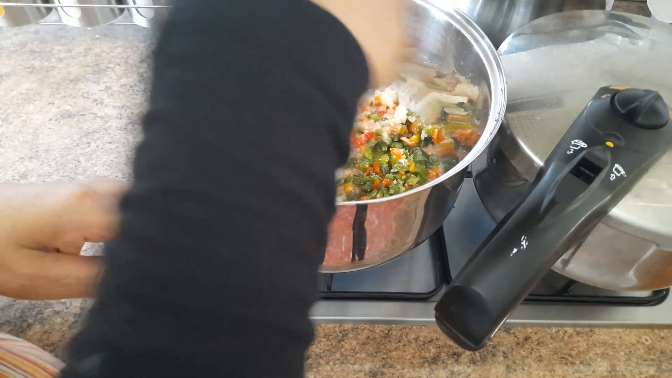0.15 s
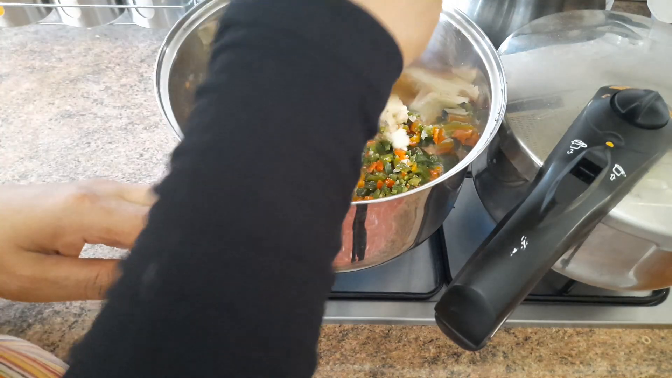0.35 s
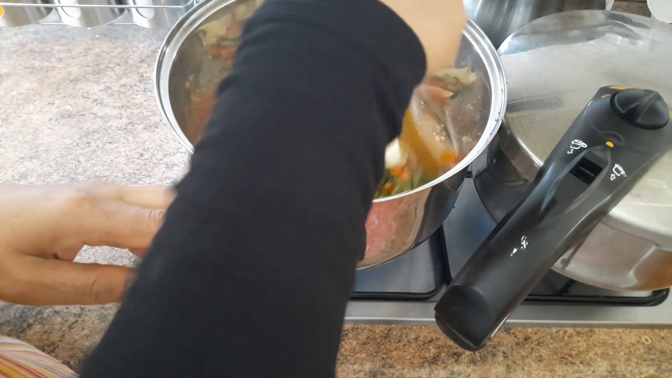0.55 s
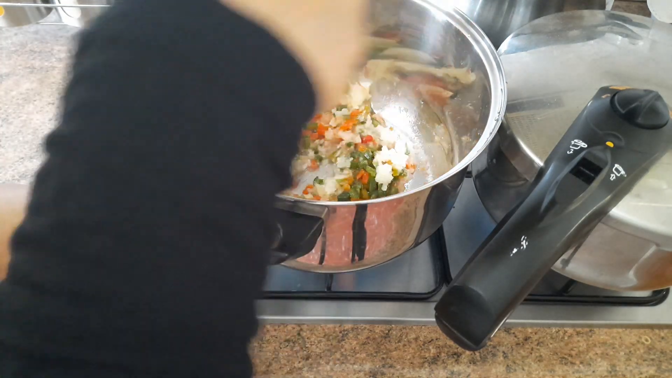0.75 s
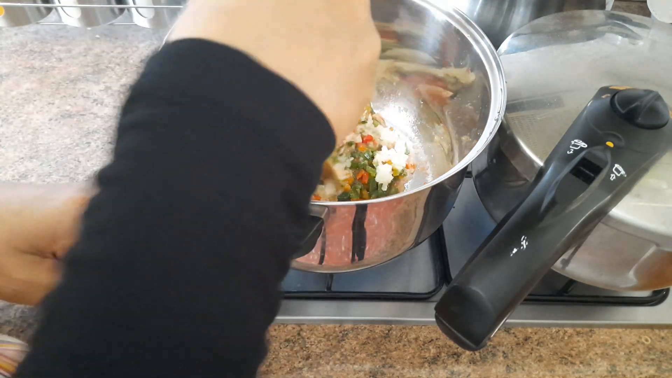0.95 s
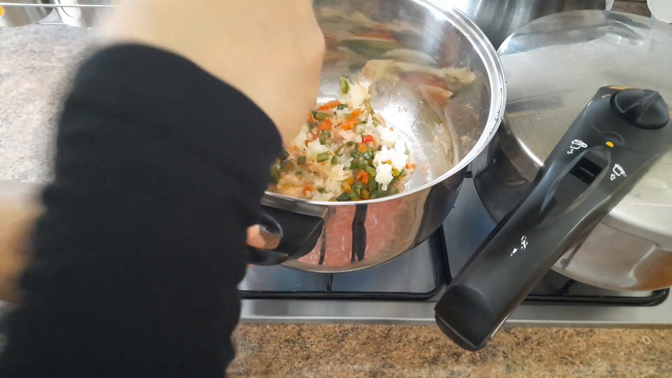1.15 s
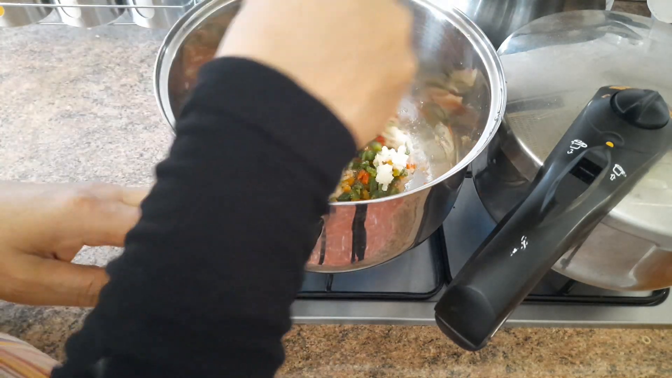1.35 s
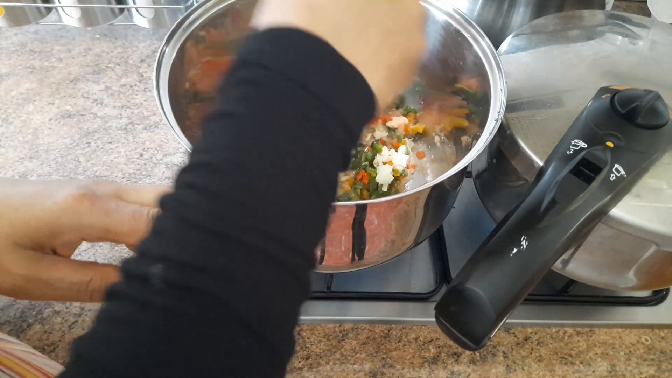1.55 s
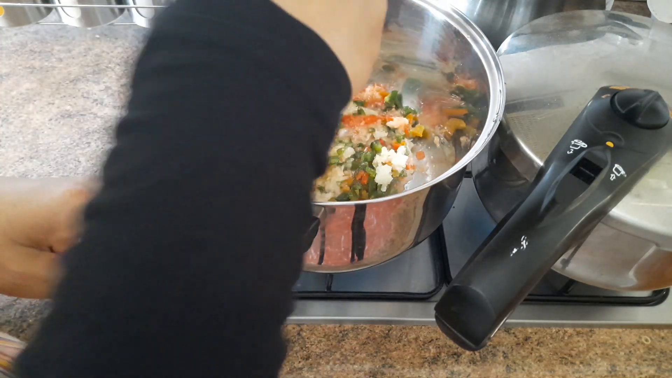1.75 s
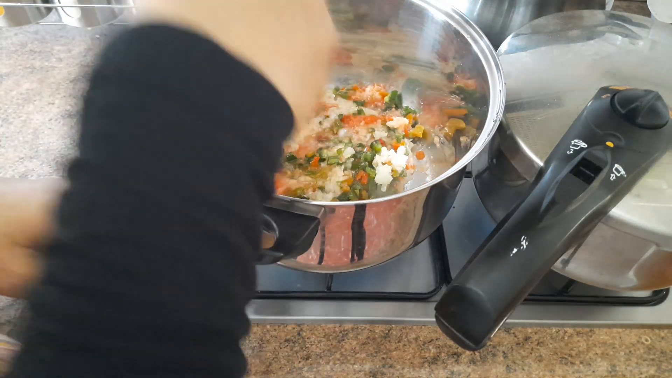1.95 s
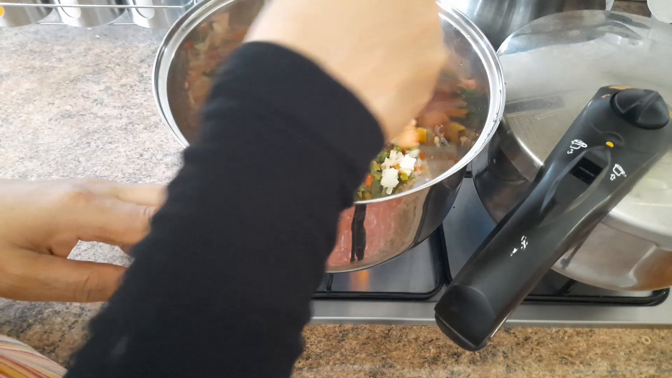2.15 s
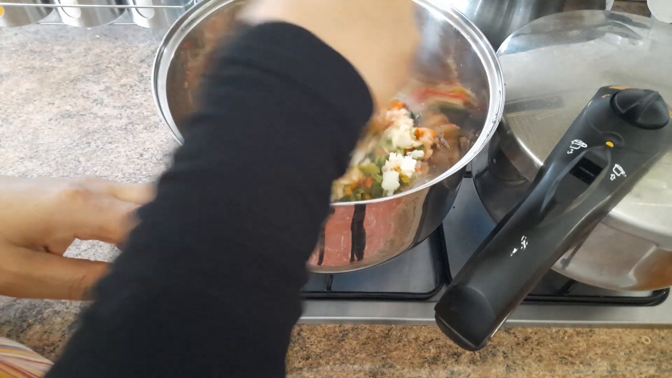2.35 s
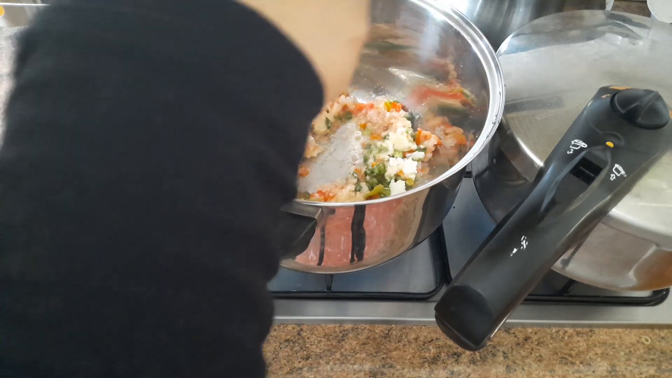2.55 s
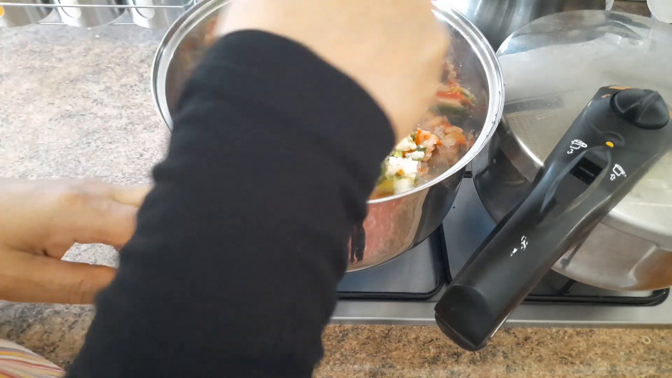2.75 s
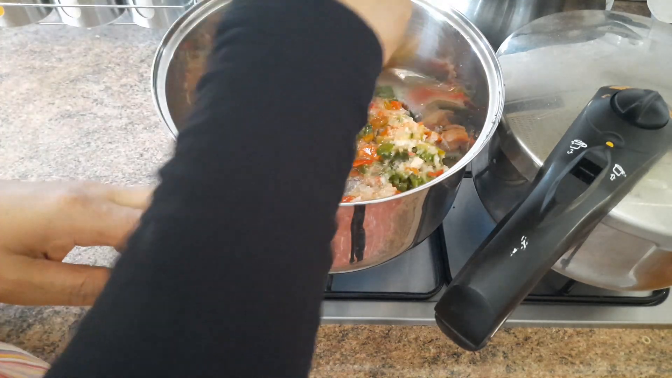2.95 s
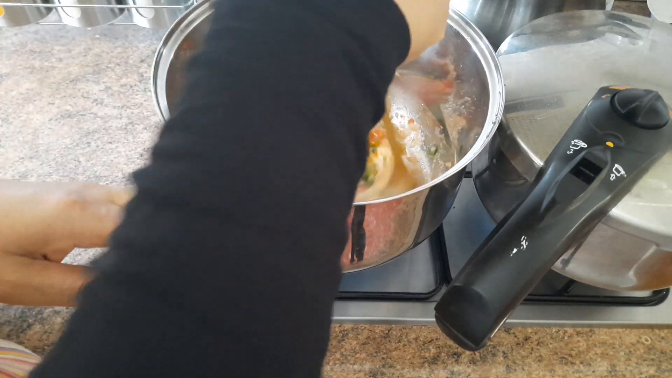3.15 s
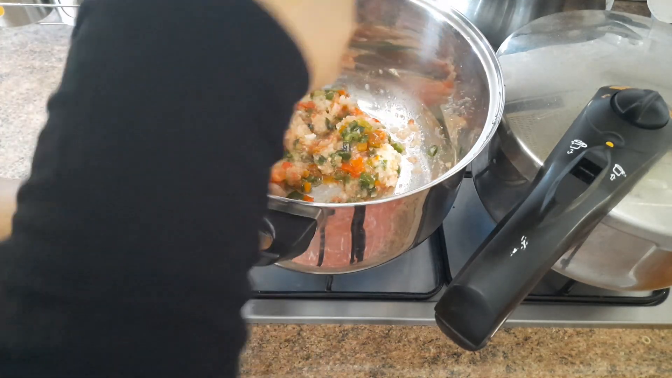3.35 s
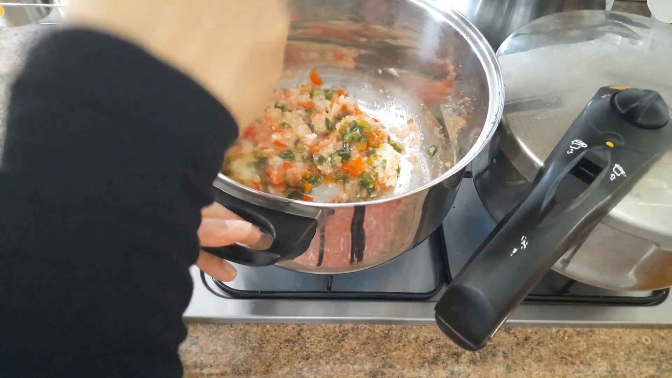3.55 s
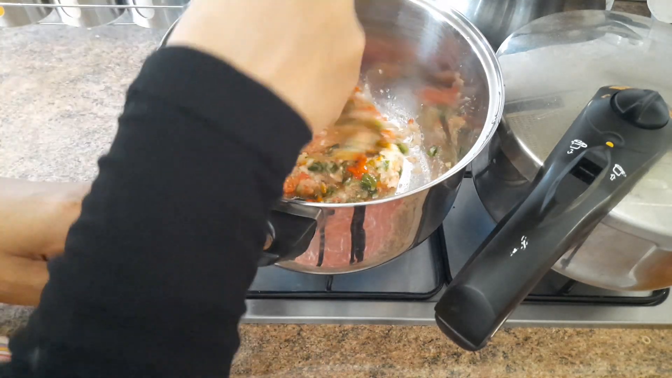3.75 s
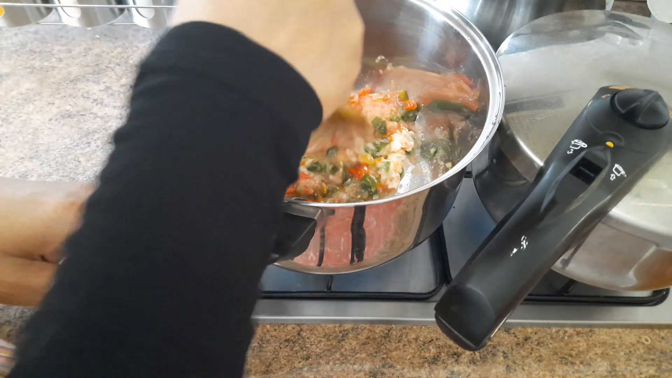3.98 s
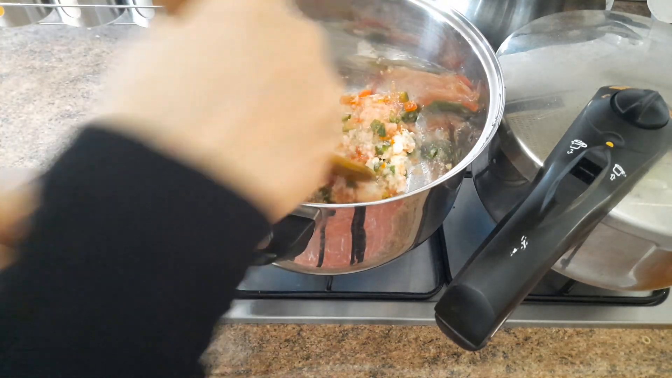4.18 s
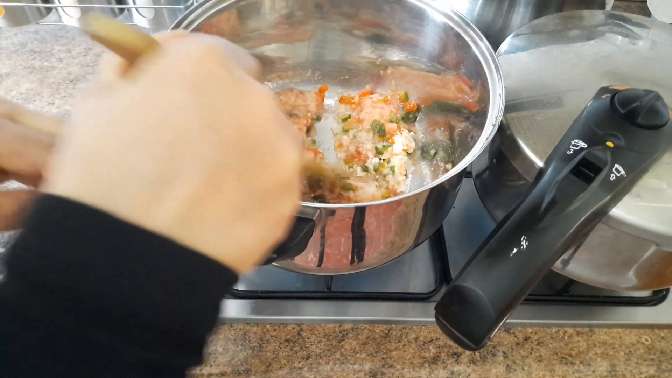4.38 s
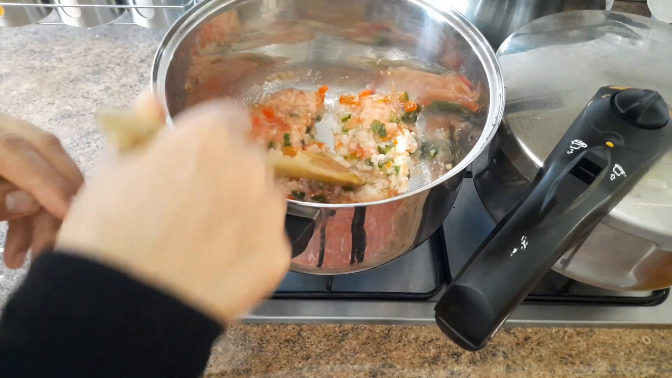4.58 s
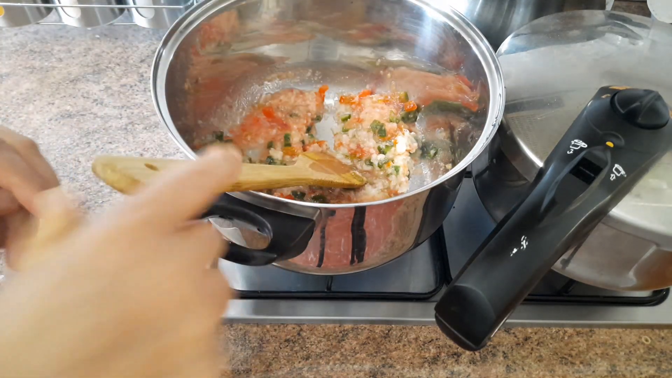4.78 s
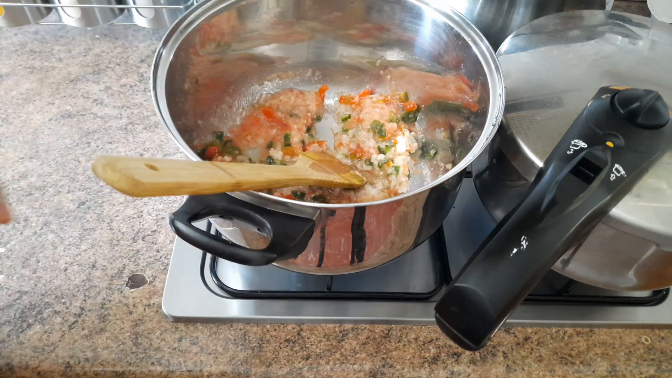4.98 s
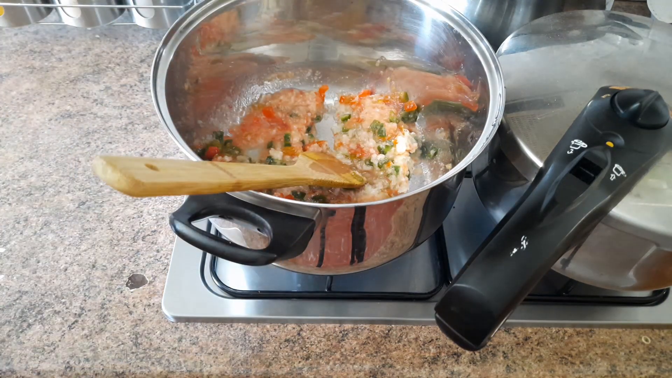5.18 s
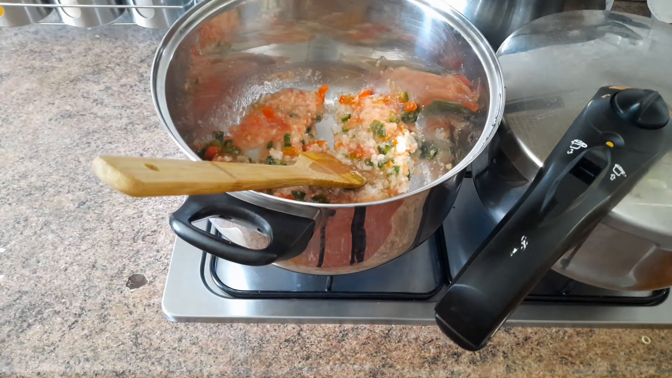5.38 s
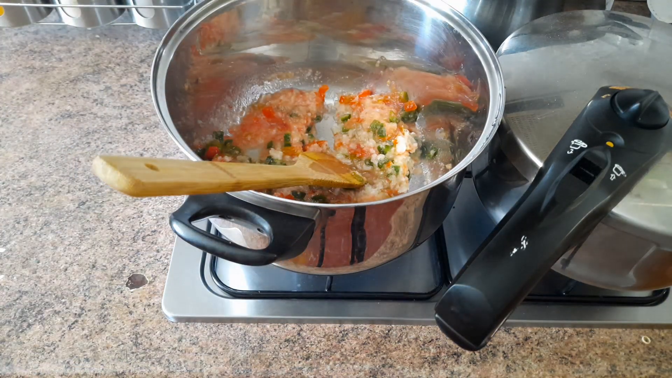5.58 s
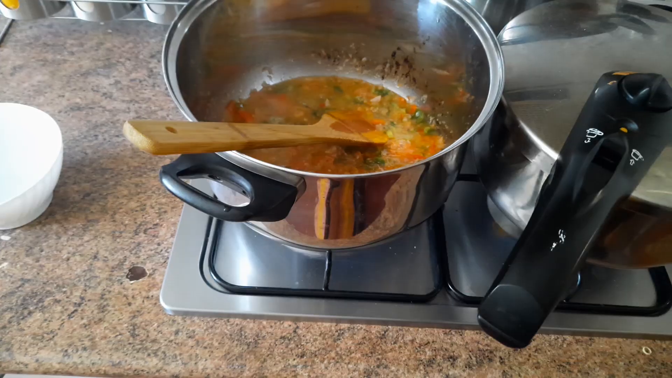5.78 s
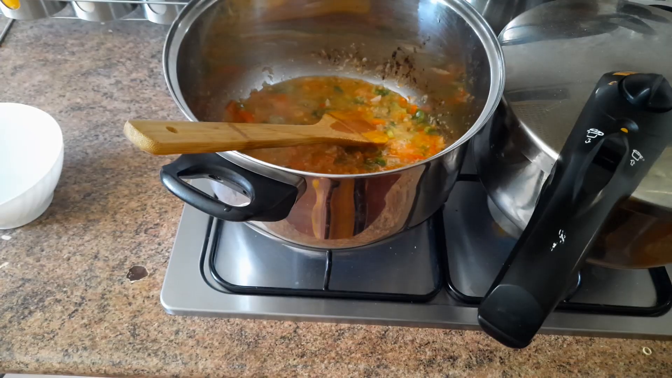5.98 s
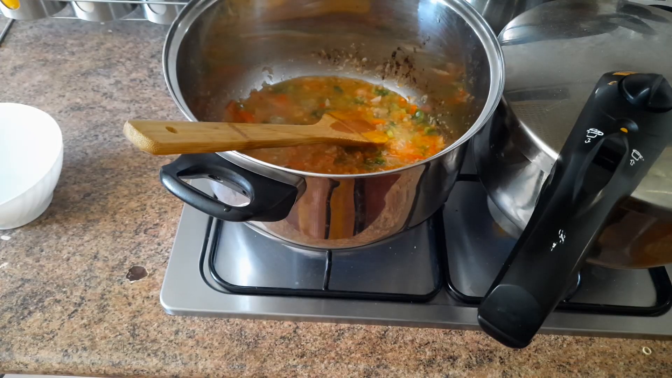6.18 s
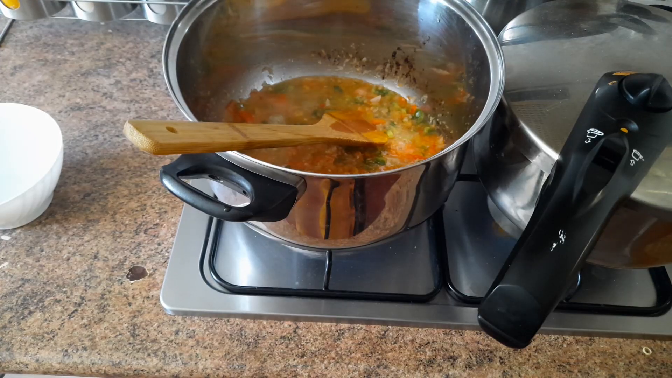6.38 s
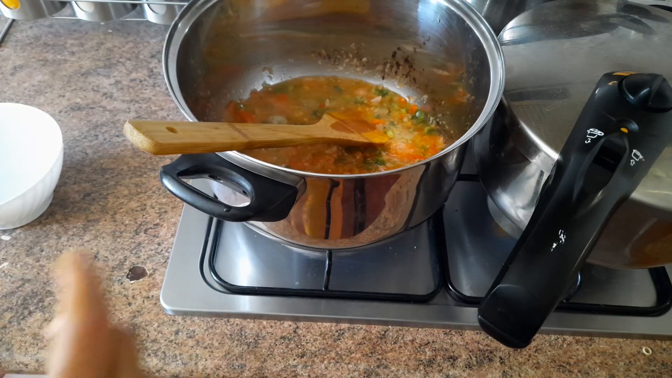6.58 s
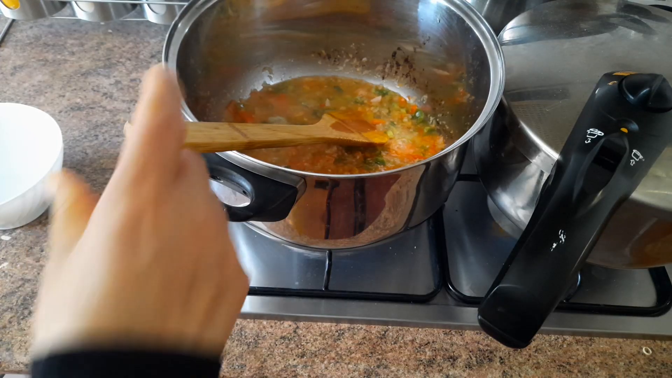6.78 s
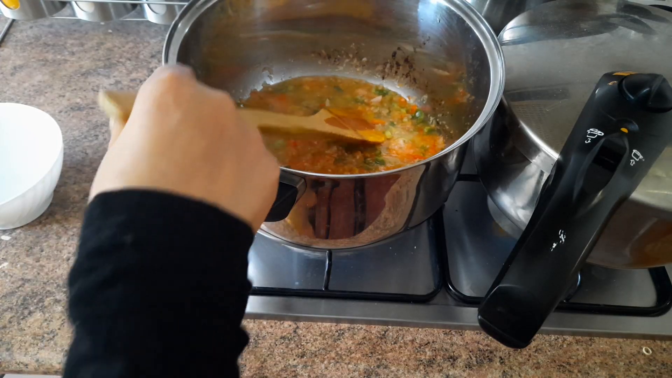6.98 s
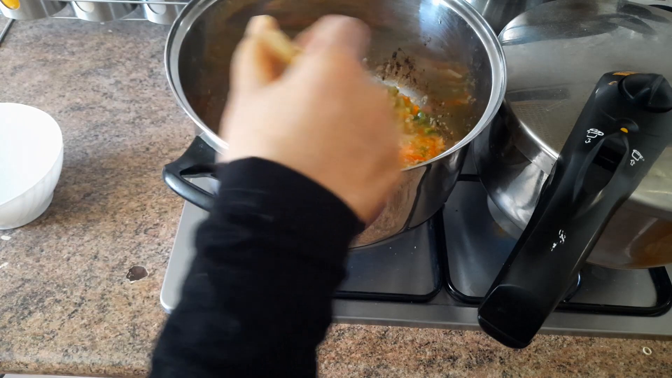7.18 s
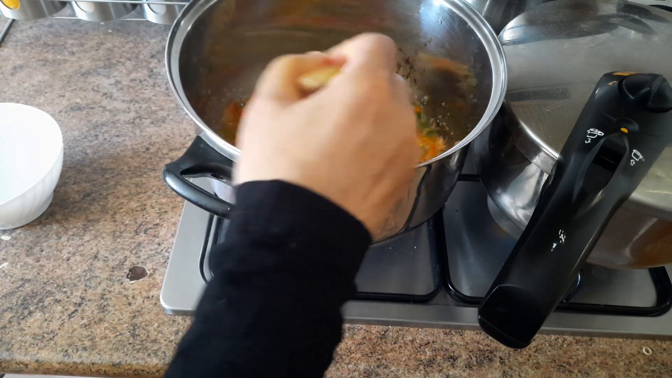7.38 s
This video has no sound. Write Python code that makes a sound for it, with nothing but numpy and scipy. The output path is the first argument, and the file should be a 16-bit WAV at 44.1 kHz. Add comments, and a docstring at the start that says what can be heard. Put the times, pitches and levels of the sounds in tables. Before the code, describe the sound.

A small, hard kitchen, heard closely in stereo with the pot slightly left. A quiet gas burner rushes steadily with a thin jet hiss. From 0 s a wooden spoon stirs food in a steel pot: soft thuds at 0.15, a resonant knock at 0.4, then a sleeve swish and drag around 0.55. Small muffled bumps and low scrapes follow until a bright, hard clank at 1.87. More drag at 2.3, knocks at 2.6, 2.95 and 3.5, a strong thud at 3.6, another clack at 3.83. A last scrape near 4.05, then the spoon is laid down with woody knocks at 4.44 and 4.66 and slight cloth rustle until 5. Near quiet. At about 5.75 soft sizzling with bubbling and fine crackle starts quickly, surging near 6.2 with low pops, slowly easing. Sleeve rustle at 6.9; faint tap and thud at 7.23 as the spoon is lifted.

```python
"""Stirring a pot on a gas hob

A wooden spoon stirs chopped vegetables in a steel pot in a small, hard kitchen. Knocks and thuds are
noise contacts plus ringing pot modes; drags and swishes (sleeve, faint wet flicks of food, one surge of
the sizzle) are filtered click patter under strokes. The spoon is laid down; later the oil is sizzling
(patter and tiny bursts), and the spoon is picked up again. Single spits pop, and the burner rushes as
steady filtered noise."""
import sys
import numpy as np
from scipy import signal
from scipy.fft import rfft, irfft, next_fast_len
from scipy.io import wavfile
from scipy.ndimage import uniform_filter1d

SR = 44100
rng = np.random.default_rng(int(sys.argv[2]) if len(sys.argv) > 2 else 0)


def transcribe(u):
    """Save the signal u as a 16-bit wav file named by the first command-line argument.

    u: samples, shape (n,) or (channels, n), limited to [-1, 1]; the rate is SR.
    q: integer samples, one column per channel.
    """
    v = np.clip(np.atleast_2d(u).T, -1, 1)
    q = np.round(v * 32767).astype(np.int16)
    wavfile.write(sys.argv[1], SR, q)


N = 327663  # samples

T_S = np.arange(2 ** 15) / SR
GRID_HZ = np.fft.rfftfreq(2 ** 15, 1 / SR)

# edges of the bands that set a blow's spectrum: f/Hz
BAND_EDGES_HZ = [35, 115, 230, 700, 1500, 4000, 8000, 16000]
CENTRES_HZ = np.sqrt(np.multiply(BAND_EDGES_HZ[1:], BAND_EDGES_HZ[:-1]))
# spoon on steel: t/s, level/dB, hardness/(dB/octave), push on the grate/dB,
#   favoured low mode f/Hz, favoured high mode f/Hz, their boost/dB, time until the spoon mutes the ring/s
KNOCKS = [(0.05, -45, -0.8, 0, 495, 2400, 7, 0.1), (0.401, -34, -2.5, -7, 969, 2955, 16.5, 0.21),
          (1.868, -28, 3, 1, 867, 2121, 9, 0.28), (2.598, -31.5, 0.97, 3, 969, 1825, 11.5, 0.25),
          (2.945, -37, -1.4, -5, 1001, 1825, 8, 0.14), (3.48, -32.5, 1.3, -8, 1001, 2062, 10, 0.13),
          (3.831, -33.5, 0.8, -2.5, 2237, 3155, 12.5, 0.11),
          (4.099, -55.5, -0.5, 9, 495, 2400, -4.5, 0.037), (4.44, -30, -4.5, -4.5, 144, 495, 8.5, 0.07),
          (4.66, -35.5, 1.4, 4.5, 322, 2062, 0, 0.055), (7.225, -50, 0, 4, 595.5, 2400, 6, 0.059)]
# knock of medium hardness: f/Hz, level of the band around it/dB
KNOCK_BANDS = [(63, -23), (163, -17), (400, -4), (1025, -5), (2450, .5), (5660, -3.5), (11300, -13)]
# broad lift around the low favoured mode, slight dip around the high one: level/dB, width/octaves
SPOT_GAINS = [(5.5, 0.37), (-1.5, .22)]
# blows cushioned by food or passed to the grate: t/s, level/dB, hardness/(dB/octave),
#   push on the grate/dB, direct sound over room/dB
THUDS = [(0.135, -33, -3, 6, -3), (0.162, -37.5, 3.5, 4, -3.5), (1.147, -45.5, -3.5, 5, 3),
         (1.173, -47, -2, 2, -4), (1.501, -49.5, -6.5, -5, 7), (1.604, -56, 4, 2.5, -2),
         (2.261, -42.5, -5, -4, 4), (2.983, -43, 3, 0, 4.5), (3.598, -23, 1.23, -10, 3),
         (4.723, -48.5, -5, 3, 8), (7.246, -41, 0.5, 0.5, -1)]
# thud of medium hardness: f/Hz, level of the band around it/dB
THUD_BANDS = [(63, -19), (163, -15), (400, -1.5), (1025, -9.5), (2450, -19.5), (5660, -33.5), (11300, -41)]
# modes of the pot: f/Hz, level/dB, t60/s
POT_MODES = [(144, -3.5, 0.72), (322, -1, 0.42), (386.6, -0.5, 0.22), (495, -5, 0.49), (590, 6, 0.33),
             (802, -9, .35), (867, -3, 0.47), (969, -4.5, 0.96), (1001, 1, 0.32), (1040, 9.5, 0.25),
             (1234, -11, 0.35), (1607, -1, 0.43), (1650, -0.5, 0.073), (1825, 0.5, 0.17), (1916, 0, 0.27),
             (2062, -5, 0.56), (2121, -2.5, 0.38), (2237, 3.5, .25), (2400, 13, 0.14), (2550, -5, .25),
             (2955, -7.5, 0.65), (3083, 6.5, 0.32), (3155, -2.5, 0.59), (3700, 8.5, 0.15), (3989, -3, .22),
             (4490, -8, .2), (4970, 4.5, .2), (5870, -10.5, .22), (5720, -3.5, .22), (6490, 8.5, 0.24)]
# colour of a blow on pot and hob, before its bands are set: f/Hz, level/dB
BLOW_COLOUR = [(25, -27.5), (55, -10.5), (110, -4.5), (152, -0.5), (200, -1), (230, -13.5), (285, 5.5),
               (520, 4), (660, -1), (1000, -2), (1350, -1), (2100, 7.5), (2800, 1.5), (7500, -11.5),
               (9500, -20), (12500, -19.5), (16000, -28.5)]
# spoon dragging food over the bottom: t at full pressure/s, rise/s, hold/s, level/dB
DRAGS = [(0.04, 0.15, .01, -58), (0.545, 0.035, 0.04, -49.5), (0.76, .09, 0.021, -55),
         (1.14, 0.11, .01, -60), (1.37, 0.055, 0.025, -63), (1.56, 0.06, 0.072, -51),
         (2.28, 0.078, .11, -49), (3.195, 0.059, 0.015, -47.5), (3.35, 0.043, .02, -62),
         (4.04, 0.087, 0.053, -51)]
# colour of the drags: f/Hz, level/dB
DRAG_COLOUR = [(71, -60), (120, -15), (220, -26), (296, 2), (409, 1.5), (612, -3), (759, -20),
               (1040, -11.5), (1360, -35.5), (2260, -27), (3000, -32), (3900, -61.5), (6600, -120)]
# swishes of sleeve, faint wet flicks of food at 0.135, 1.7 and 5.21 s, and at 6.185 s a surge
#   of the sizzle: t at full strength/s, rise/s, hold/s, level/dB
SWISHES = [(0.135, 0.045, 0.017, -51.5), (0.555, 0.14, 0.031, -36), (0.77, 0.13, 0.046, -58.5),
           (1.47, 0.03, 0.012, -44.5), (1.595, .04, 0.009, -60), (1.7, 0.032, 0.011, -63),
           (2.203, 0.0067, 0.033, -43), (2.26, 0.019, 0.036, -48), (3.125, 0.15, 0.023, -48.5),
           (4.625, 0.041, 0.018, -51), (4.76, 0.075, 0.016, -52.5), (4.925, .1, 0.02, -50.5),
           (5.21, 0.11, 0.018, -70.5), (6.185, .07, 0.047, -45.5), (6.92, 0.16, 0.097, -50)]
# colour of the swishes: f/Hz, level/dB
SWISH_COLOUR = [(410, -28.5), (700, -2), (1080, 0.5), (1210, -3), (1580, 2), (4380, 1), (7010, 3.5),
                (9230, -3.5), (13900, 0.5), (16000, -7.5)]
# hiss flaring up as wet food meets the oil: t/s, rise/s, hold/s, level/dB
FLARES = [(.24, .1, 0.015, -61.5), (1.02, .25, 0.026, -72), (1.17, 0.076, 0.021, -69),
          (1.3, 0.057, 0.016, -80), (3.29, 0.08, .1, -72), (4.3, .1, 0.12, -76), (6.19, 0.29, 0.04, -64),
          (6.4, 0.027, 0.011, -61), (6.54, 0.055, 0.014, -64), (6.93, 0.078, 0.04, -59)]
# colour of the frying hiss: f/Hz, level/dB
HISS_COLOUR = [(410, -28.5), (700, -6.5), (788, -9.5), (1080, -8), (1350, -13), (1660, -9.5), (3240, -13),
               (8310, -15), (9480, -26.5), (12800, -15.5), (16000, -25)]
# colour of steam bubbling under the food: f/Hz, level/dB
BUBBLE_COLOUR = [(24, -42), (40, -80), (125, -4), (232, -21), (279, -2), (383, 2.5), (426, -3.5),
                 (535, 3.5), (632, -17), (896, -41), (1090, -2), (1210, -16.5), (1500, -20), (1950, -48),
                 (3300, -120)]
# drops of oil bursting, and at 1.172 s a bright wet flick of food: t/s, level/dB, centre f/Hz
SPITS = [(0.333, -47.5, 8900), (.889, -68, 4300), (1.172, -63, 12000), (1.605, -57.5, 9000),
         (2.08, -64, 9000), (2.413, -62, 7950), (5.372, -69.5, 9000), (5.731, -51.5, 2400),
         (6.039, -46, 630), (6.11, -53, 1000), (6.403, -55.5, 1560), (6.7, -52.5, 910)]
# colour of gas flame and room: f/Hz, level/dB
FLAME_COLOUR = [(15, -54), (25, -21), (76, 0.5), (217, -11), (531, -6), (754, -22), (1480, -8),
                (1740, -45.5), (2350, -4.5), (2840, -52), (5880, -40), (8360, -14.5), (9570, -29.5),
                (10700, -15), (16000, -29)]
# kitchen reverberation, slow to build up in the bass: f/Hz, t60/s, build-up time constant/s
KITCHEN = [(69.6, 0.65, 0.044), (148, 0.26, 0.033), (404, 0.35, 0.0026), (1000, 0.35, .002),
           (3000, 0.34, 0.0041), (7000, .28, 0.00033), (14000, 0.21, 0.00058)]
# likeness of the two microphones in diffuse sound: f/Hz, coherence/1
COHERENCE = [(150, 0.72), (300, 0.93), (600, 0.2), (1200, 0.041), (16000, 0.016)]
# stereo balance: f/Hz, left over right/dB
LEFT_OVER_RIGHT = [(60, 3.5), (99, 1.5), (160, 2.5), (270, 3.5), (450, 5), (740, 3.5), (1220, 2.5),
                   (2010, 1.5), (3330, 3), (5500, -0.5), (9080, 1.5), (15000, 6.5)]

BASS_BELOW_HZ = 230
HARD_FROM_HZ, HARD_TO_HZ = 460, 5740  # hardness tilts the spectrum between these
SPOT_BAND_DB = 6  # lift of the band that holds the favoured low mode
# click over room; treble level above which the clang buries it, in dB per dB
CLICK_DB, CLANG_FROM_DB, CLICK_LOSS_DB_PER_DB = -6, -38, 0.86
DRAG_RELEASE_DB_PER_S, SWISH_RELEASE_DB_PER_S, FLARE_RELEASE_DB_PER_S = 177, 241.5, 223
WARM_DB, WARM_DB_PER_S = -72, -0.7  # faint hiss: level at 0 s, drift
HOT_DB, HOT_AT_S, HEAT_UP_S, SETTLE_DB_PER_S = -54.5, 5.76, 0.11, 2.5  # full sizzle
STEAM_DB, STEAM_AT_S, STEAM_RISE_S = -1.5, 5.82, 0.17  # bubbling against the hiss


def knocks():
    """Wood on steel: a sharp click, the ring of the pot, and the room."""
    out = np.zeros((2, N))
    for t_s, db, hardness, push_db, low_hz, high_hz, boost_db, mute_s in KNOCKS:
        bands_db = blow_levels(KNOCK_BANDS, db, hardness, push_db, pivot_hz=1520)
        bands_db = bands_db + SPOT_BAND_DB * np.histogram([low_hz], BAND_EDGES_HZ)[0]
        direct_db = CLICK_DB - CLICK_LOSS_DB_PER_DB * max(bands_db[-2] - CLANG_FROM_DB, 0)
        spot_db = sum(bump(hz, gain_db, width_oct)
                      for hz, (gain_db, width_oct) in zip((low_hz, high_hz), SPOT_GAINS))
        clank = tint(contact(direct_db), spot_db)
        blow = clank + amp(-17) * ring(low_hz, high_hz, boost_db, mute_s)
        add(out, t_s, weigh(blow, bands_db))
    return out


def thuds():
    """Soft blows rock the loaded pot on its grate: a short boom, low modes favoured, little treble."""
    out = np.zeros((2, N))
    boom_db = bump(295, gain_db=7, width_oct=0.4)  # the grate
    for t_s, db, hardness, push_db, direct_db in THUDS:
        boom = tint(contact(direct_db), boom_db)
        blow = boom + amp(-15.5) * ring(323, 495, boost_db=6.0, mute_s=0.021)
        bands_db = blow_levels(THUD_BANDS, db, hardness, push_db, pivot_hz=HARD_FROM_HZ)
        add(out, t_s, weigh(blow, bands_db))
    return out


def ring(low_hz, high_hz, boost_db, mute_s):
    """The pot's modes; the struck spot favours two, until the spoon presses on the wall again."""
    hz, table_db, t60_s = np.transpose(POT_MODES)
    # a mode struck near its node stays weak
    db = table_db - rng.exponential(7.1, len(hz)) + 0.5
    for favoured_hz in (low_hz, high_hz):
        k = np.argmin(abs(hz - favoured_hz))
        db[k] = table_db[k] + boost_db
    # the food shifts and loads the pot differently at each blow
    hz = hz * (1 + 0.002 * rng.standard_normal())
    # each mode has a shorter-lived twin, as the pot is not quite round: the pair beats
    beat_hz = hz * rng.normal(0, 0.019, len(hz))
    twin = 0.35 * np.exp(2j * np.pi * beat_hz[:, None] * T_S - T_S / 0.63)
    decay = amp(db[:, None] - 60 * T_S / t60_s[:, None])
    modes = decay * np.exp(2j * np.pi * hz[:, None] * T_S) * (1 + 1j * twin)
    # higher modes reach the two microphones further out of step
    phase_spread = np.minimum((hz / 1200) ** 2, 1.5)
    phase = 2 * np.pi * rng.random(len(hz)) + phase_spread * rng.standard_normal((2, len(hz)))
    muting = amp(-150 * np.maximum(T_S - mute_s, 0))
    return (np.exp(1j * phase) @ modes).real * muting


def contact(direct_db):
    """The first milliseconds, straight from the pot and off the hob, followed by the room."""
    swell_and_fade = np.exp(-T_S / 0.0055) * (1 - np.exp(-T_S / 0.0014))
    near = diffuse(size=len(T_S)).mean(0) * swell_and_fade
    room = kitchen(direct_db=-27.5)
    return room + amp(direct_db) * unit(near) * room.std()


def blow_levels(bands, db, hardness, push_db, pivot_hz):
    """Band levels: a harder contact tilts them towards the treble, a push on the grate adds bass."""
    octaves = np.log2(np.clip(CENTRES_HZ, HARD_FROM_HZ, HARD_TO_HZ) / pivot_hz)
    return db + read(bands, CENTRES_HZ) + hardness * octaves + push_db * (CENTRES_HZ < BASS_BELOW_HZ)


def weigh(x, bands_db):
    """Contact hardness: sets band levels over a blow's first 40 ms (the slow bass: 100 ms)."""
    # every spot drives the pot's many short-lived modes with its own uneven strengths
    uneven = uniform_filter1d(rng.standard_normal(len(GRID_HZ)), size=90)
    uneven = unit(uniform_filter1d(uneven, size=50))
    x = tint(x, read(BLOW_COLOUR) + 3.4 * uneven * np.minimum(GRID_HZ / 1500, 1))
    for _ in range(2):  # the second pass refines the levels
        fast, slow = onset_power(x, SR // 25), onset_power(x, SR // 10)
        power = np.where(GRID_HZ < BASS_BELOW_HZ, slow, fast)
        now_db = 10 * np.log10(np.histogram(GRID_HZ, BAND_EDGES_HZ, weights=power)[0])
        x = tint(x, read(np.c_[CENTRES_HZ, bands_db - now_db]))
    return x


def onset_power(x, size):
    """Mean power per frequency bin over the first samples of a sound."""
    return (abs(rfft(x[:, :size], len(T_S))) ** 2).mean(0) * 2 / (len(T_S) * size)


def drags():
    """Small slips of the spoon shake the pot's loaded bottom."""
    slips = patter(per_s=270, spread_db=-6, direct_db=-5)
    return unit(tint(slips, read(DRAG_COLOUR))) * level(DRAGS, DRAG_RELEASE_DB_PER_S)


def swishes():
    """Dense patter swells as sleeve fibres slide, as wet food flicks, and once as the sizzle surges."""
    rustle = patter(per_s=6000, spread_db=7.0, direct_db=-27.0)
    return unit(tint(rustle, read(SWISH_COLOUR))) * level(SWISHES, SWISH_RELEASE_DB_PER_S)


def frying():
    """Water leaves the oil as hiss and fine crackle; once it is hot, steam bubbles under the food too."""
    t_s = np.arange(N) / SR
    warm_db = WARM_DB + WARM_DB_PER_S * t_s
    hot_db = HOT_DB - SETTLE_DB_PER_S * (t_s - HOT_AT_S)
    hot_db = hot_db - 20 * np.maximum(HOT_AT_S - t_s, 0) / HEAT_UP_S
    sizzle = amp(warm_db) + amp(hot_db) + level(FLARES, FLARE_RELEASE_DB_PER_S)
    steam = amp(STEAM_DB - 20 * np.maximum(STEAM_AT_S - t_s, 0) / STEAM_RISE_S)
    hiss = unit(tint(patter(per_s=4600, spread_db=0.0, direct_db=-15.5), read(HISS_COLOUR)))
    bubbles = unit(tint(patter(per_s=450, spread_db=2.5, direct_db=8), read(BUBBLE_COLOUR)))
    return sizzle * (hiss + amp(-7.5) * crackle(per_s=750, spread_db=2.0) + steam * bubbles)


def crackle(per_s, spread_db):
    """Tiny bursts in the oil, each a few cycles at its own pitch, close and dry."""
    happens = rng.random(N) < per_s / SR
    sizes = amp(spread_db * np.minimum(rng.exponential(1, N), 3.5)) * happens
    pitches_hz, t_s = np.geomspace(5000, 15000, num=12), np.arange(128) / SR
    kind = rng.integers(0, len(pitches_hz), N)
    out = np.zeros((2, N))
    for k, hz in enumerate(pitches_hz):
        cycles = hz * t_s + 0.49 * rng.random((2, 1))
        pop = np.sin(2 * np.pi * cycles) * np.exp(-t_s * hz / 2.9)
        out += signal.oaconvolve((sizes * (kind == k))[None], unit(pop), axes=1)[:, :N]
    return unit(out)


def spits():
    """Single larger drops of oil burst, and once a wet flick of food: broad pops whose direct sound lasts a few
    milliseconds."""
    out = np.zeros((2, N))
    for t_s, db, centre_hz in SPITS:
        pop = tint(contact(direct_db=1.0), -9 * np.log2((GRID_HZ + 1) / centre_hz) ** 2)
        add(out, t_s, amp(db) * pop / pop[:, :SR // 100].std())
    return out


def flame():
    """The burner's steady rush, with a narrow hiss from its jet."""
    rush = unit(tint(diffuse(size=N), read(FLAME_COLOUR)))
    jet_hz, width_hz = 2350, 170
    jet_db = -20 * np.log10(1 + ((GRID_HZ - jet_hz) / width_hz) ** 2)
    jet = unit(tint(diffuse(size=N), jet_db))
    return amp(-68.0) * rush + amp(-68.5) * jet


def patter(per_s, spread_db, direct_db):
    """Random tiny clicks of uneven size from three spots, heard in the kitchen."""
    sizes = amp(spread_db * np.minimum(rng.exponential(1, N), 5))
    clicks = sizes * rng.choice([-1, 1], N) * (rng.random(N) < per_s / SR)
    spot = rng.integers(0, 3, N)
    out = np.zeros((2, N))
    for k in range(3):
        out += signal.oaconvolve((clicks * (spot == k))[None], kitchen(direct_db), axes=1)[:, :N]
    return unit(out)


def kitchen(direct_db):
    """A click and its dense reflections; each band swells and dies at its own speed."""
    spectrum = rfft(diffuse(size=len(T_S)))
    centres_hz = [row[0] for row in KITCHEN]
    out = np.zeros((2, len(T_S)))
    for share, (_, t60_s, rise_s) in zip(np.eye(len(centres_hz)), KITCHEN):
        envelope = (1 - np.exp(-T_S / rise_s)) * amp(-60 * np.maximum(T_S - 0.015, 0) / t60_s)
        band = irfft(spectrum * read(np.c_[centres_hz, share]))
        out += band * envelope / envelope.max()
    out[:, 0] += amp(direct_db) * np.linalg.norm(out[0])
    return out


def diffuse(size):
    """White noise at two microphones, alike in the bass only."""
    a, b = rfft(rng.standard_normal((2, next_fast_len(size))))
    same = np.clip(read(COHERENCE, np.linspace(0, SR / 2, len(a))), -1, 1)
    return irfft([a, same * a + np.sqrt(1 - same ** 2) * b])[:, :size]


def tint(x, gain_db):
    """Causal minimum-phase filter with the given gain over GRID_HZ, at most 90 dB deep."""
    log_gain = np.log(amp(np.maximum(gain_db, gain_db.max() - 90)))
    both_sides = np.r_[log_gain, log_gain[-2:0:-1]]
    taps = np.fft.ifft(np.exp(signal.hilbert(both_sides).conj())).real[:4096]
    return signal.fftconvolve(x, taps[None], axes=1)[:, :x.shape[1]]


def bump(hz, gain_db, width_oct):
    """Bell-shaped gain in dB around a frequency."""
    return gain_db * np.exp(-(np.log2((GRID_HZ + 1) / hz) / width_oct) ** 2)


def level(strokes, release_db_per_s):
    """Gain over time of strokes: each climbs 20 dB in its rise time, holds, and dies away."""
    t_s = np.arange(N) / SR
    gain = np.zeros(N)
    for full_s, rise_s, hold_s, db in strokes:
        climb_db = 20 * np.maximum(full_s - t_s, 0) / max(rise_s, 0.001)
        fall_db = release_db_per_s * np.maximum(t_s - full_s - hold_s, 0)
        gain += amp(db - climb_db - fall_db)
    return gain


def read(points, hz=GRID_HZ):
    """Reads a table along log frequency."""
    f_hz, value = np.transpose(points)
    return np.interp(np.log(hz + 1), np.log(f_hz + 1), value)


def add(mix, t_s, sound):
    """Mixes a sound in at a time."""
    part = mix[:, max(0, round(t_s * SR)):][:, :sound.shape[1]]
    part += sound[:, :part.shape[1]]


def amp(db):
    """Decibels to gain."""
    return 10 ** (np.asarray(db) / 20)


def unit(x):
    """Scales to rms 1."""
    return x / np.sqrt(np.mean(x ** 2) + 1e-20)


def scene():
    """The pot stands a little to the left, and the two microphones colour it differently."""
    mix = knocks() + thuds() + drags() + swishes() + frying() + spits() + flame()
    half_db = read(LEFT_OVER_RIGHT) / 2
    return np.vstack([tint(mix[:1], half_db), tint(mix[1:], -half_db)])


def record(dry):
    """The recorder's band limit: a low-pass at 16.1 kHz."""
    edge = signal.firwin(401, 16100, window=("kaiser", 8), fs=SR)
    return signal.oaconvolve(dry, edge[None], "same")


dry = scene()
out = record(dry)
transcribe(out)
```